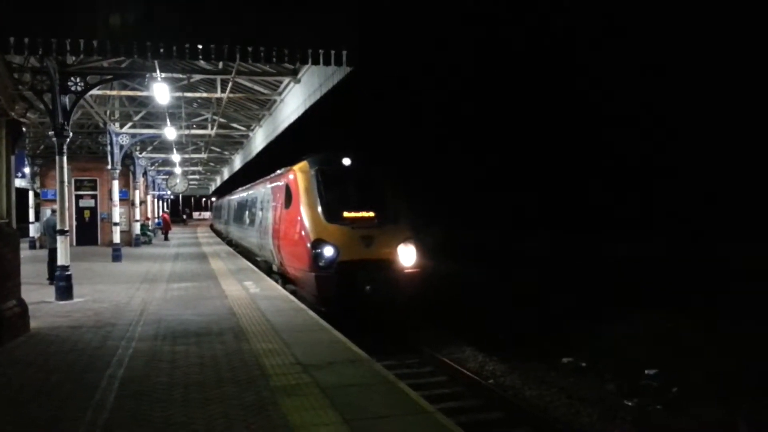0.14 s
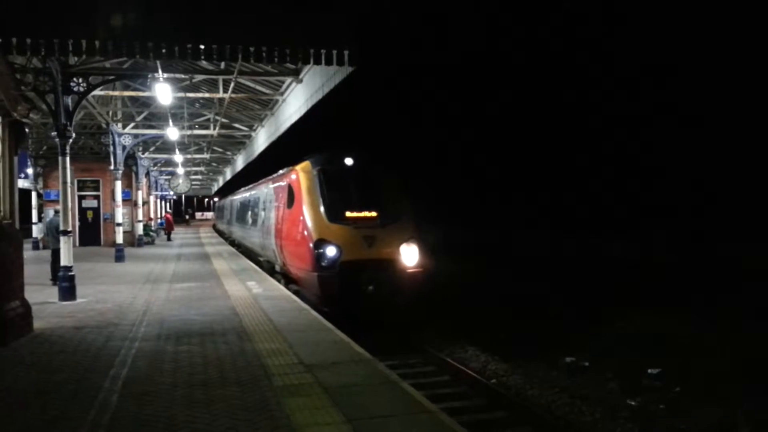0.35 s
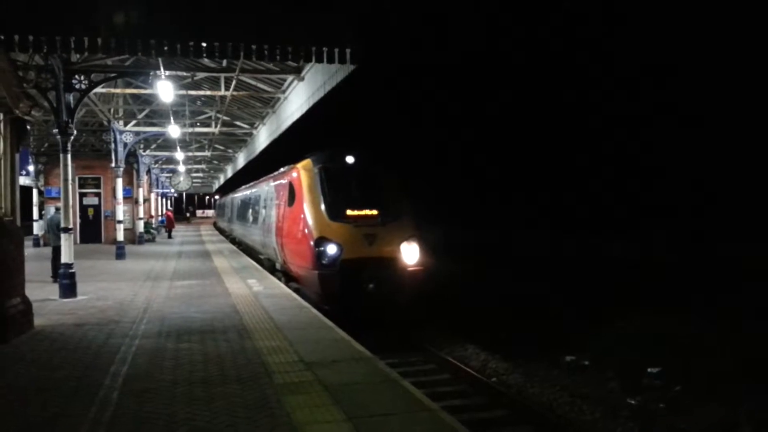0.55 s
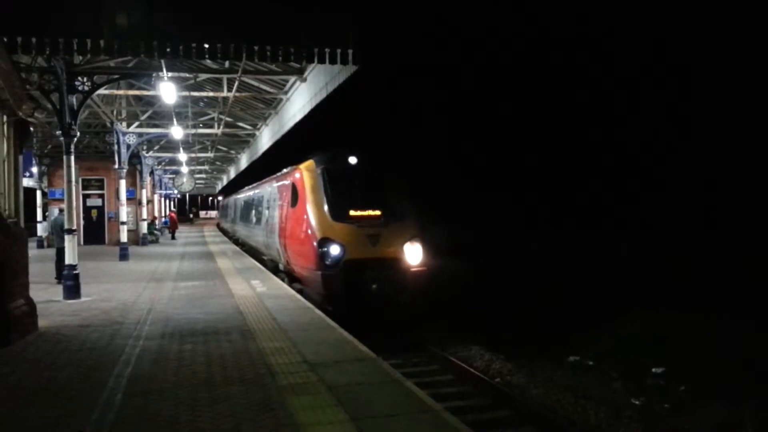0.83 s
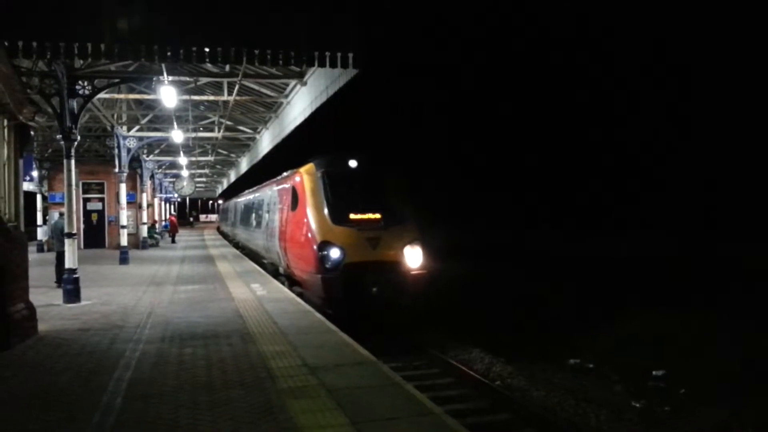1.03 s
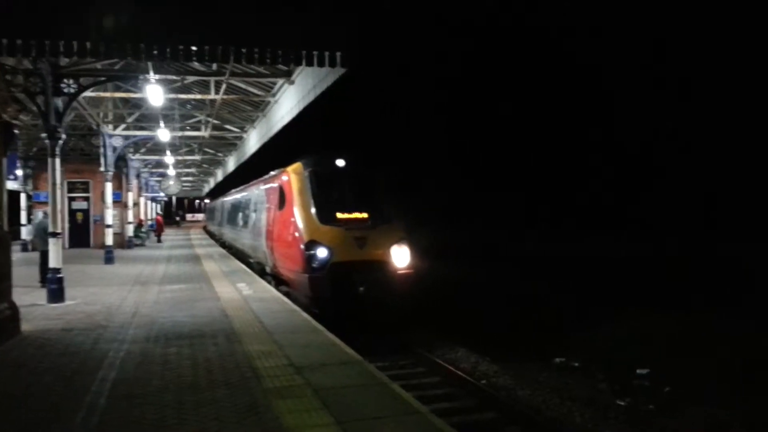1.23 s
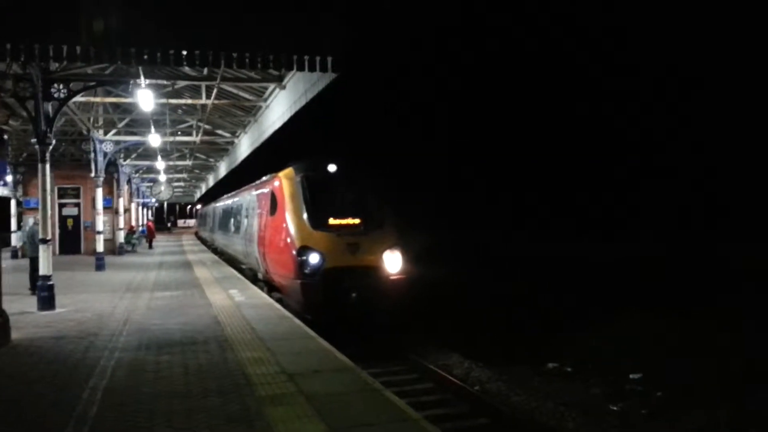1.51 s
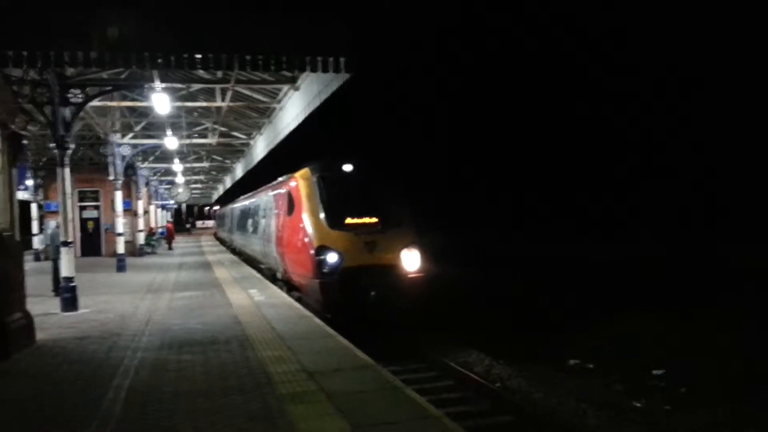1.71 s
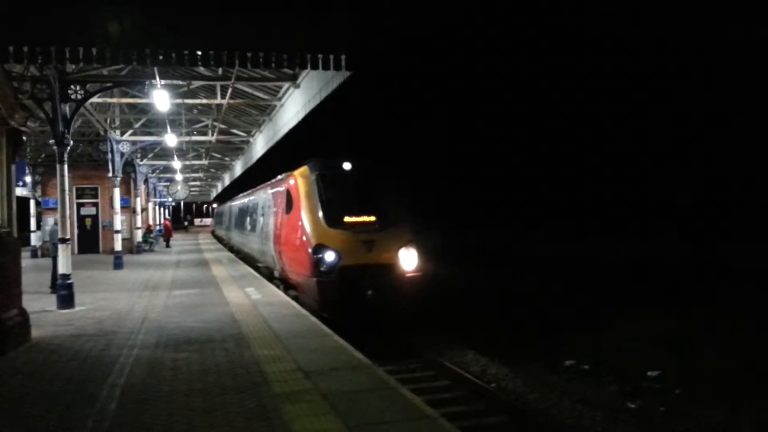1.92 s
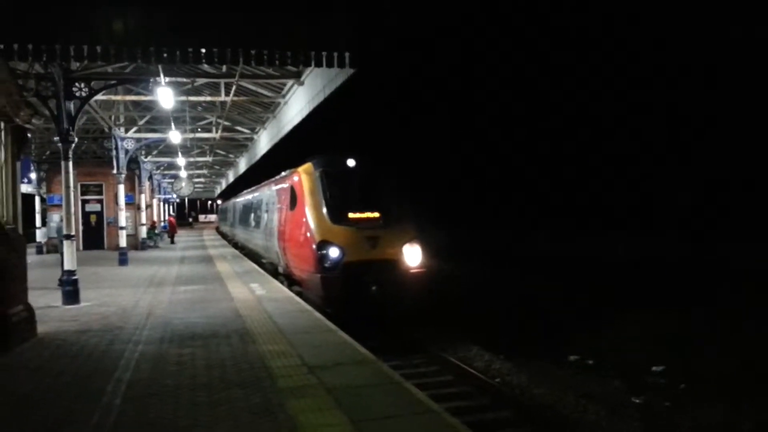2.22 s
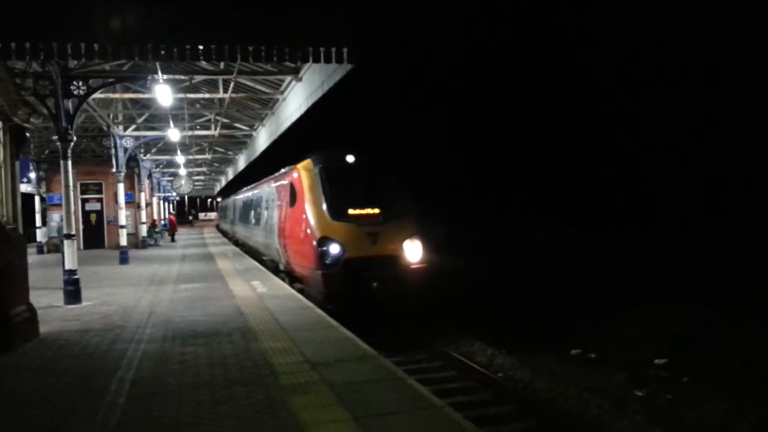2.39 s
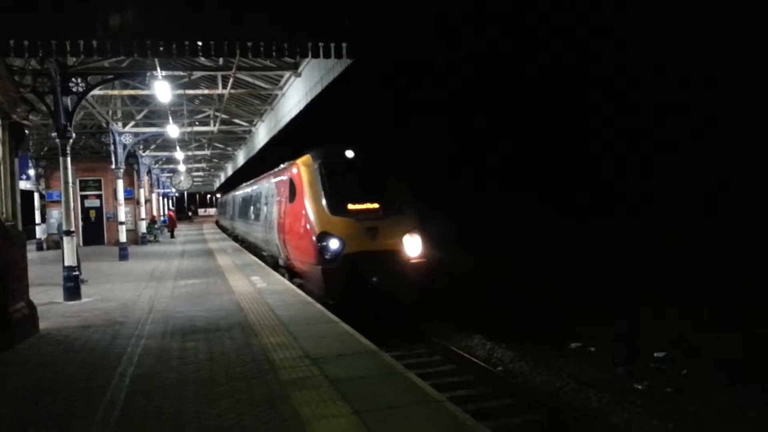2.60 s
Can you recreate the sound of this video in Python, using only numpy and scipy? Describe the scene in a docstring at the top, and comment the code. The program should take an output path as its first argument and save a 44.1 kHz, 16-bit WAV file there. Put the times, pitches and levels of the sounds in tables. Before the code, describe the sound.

Continuous idling of several underfloor diesel engines beside an open, canopied platform, slowly beating hum and roar under a constant whine; from about one second, faint air hiss flickers at the right of the wide stereo pickup.

```python
"""A station platform, where a diesel train idles. Three underfloor engines each repeat a fixed cycle at nearly
the same speed, so their harmonics beat slowly; casings ring near 850, 1700 and 3100 Hz (the whine).
Coloured noise makes the fan and exhaust roar, sines the steady tones: strong upper harmonics of the
engines, and a fan or alternator near 245 Hz. A faint air hiss, treble noise, flutters on the right.
Two spaced microphones hear the bass alike and the treble unalike."""
import sys
import numpy as np
from scipy import signal
from scipy.fft import irfft
from scipy.io import wavfile
from scipy.ndimage import uniform_filter1d

SR = 44100
rng = np.random.default_rng(int(sys.argv[2]) if len(sys.argv) > 2 else 0)


def dump(signal):
    """Clip the signal to [-1, 1] and save it as 16-bit WAV at the path in sys.argv[1]."""
    limited = np.clip(np.atleast_2d(signal).T, -1, 1)
    pcm = np.round(limited * 32767).astype(np.int16)
    wavfile.write(sys.argv[1], SR, pcm)


def ratio(d):
    """dB to gain"""
    e = np.asarray(d, float) / 20
    return 10 ** e


N = 121275  # samples


def evened(x):
    """Normalisation: scales a signal to an rms of 1."""
    return x / np.sqrt(np.mean(x ** 2) + 1e-20)


def read(points, hz, column=1):
    """Spectral envelope: one column of a table, interpolated over log frequency."""
    rows = np.array(points, float)
    return np.interp(np.log(hz + 1), np.log(rows[:, 0] + 1), rows[:, column])


def slow(t, fastest_per_s):
    """Random modulation of rms 1: superposed slow sines, weaker as they get faster."""
    rate = np.geomspace(fastest_per_s / 10, fastest_per_s, 20)
    turn = rng.random(20)
    waves = np.sin(2 * np.pi * (rate * t[:, None] + turn)) / np.sqrt(rate)
    return waves.sum(1) / np.sqrt((.5 / rate).sum())


# Spaced microphone pair: frequency_hz, likeness (0-1), left_minus_right_db
MICROPHONES = [(40, 1, -3), (130, 1, -1), (314, 0.94, 0.5), (600, 0.79, -1), (836, 0.75, 1.2),
               (1150, 0.22, 2), (1450, 0.1, 3.5), (1710, 0.57, 5.5), (2010, 0.06, 6.5), (2410, 0.2, 7.5),
               (3170, 0, 3), (4330, 0, 0.5), (7450, 0.1, 1.5), (9000, 0, -11.5), (14000, 0.5, -23)]
# Phase between the microphones: frequency_hz, left_lag_rad
PHASE_LAG = [(60, .05), (340, .17), (860, .2), (1150, .6), (1650, 1.25), (2200, 1.2), (3200, .9)]


def paired(z1, z2, hz):
    """Partial coherence: left and right spectra share less of one source where likeness is low."""
    likeness = np.clip(read(MICROPHONES, hz), 0, 1)
    tilt_db = read(MICROPHONES, hz, column=2)
    mixed = likeness * z1 + np.sqrt(1 - likeness ** 2) * z2
    right = mixed * np.exp(1j * read(PHASE_LAG, hz))
    return np.array([z1 * ratio(tilt_db / 2), right * ratio(-tilt_db / 2)])


# Broad colour of the casing sound per Hz: frequency_hz, level_db (relative)
CASING_COLOUR = [(25, -40), (65, -40), (100, -26), (140, -8.5), (190, -5), (280, -2.5), (420, -6.5),
                 (520, -6), (1100, -5.5), (1400, -8.5), (1900, -12), (2700, -16), (3800, -21), (5500, -29),
                 (7800, -34.5), (10000, -49), (15000, -63)]
# Casing resonances: frequency_hz, width_hz (centre to 1/e of the boost), boost_db
CASING_RINGS = [(693, 32, 3), (833, 89, 4.5), (1642, 112, 10), (1741, 36, 6.5), (3135, 230, 7.5),
                (4580, 360, 3), (7160, 330, 3.5)]


def casing_db(hz):
    """Resonance: bell-shaped boosts stand on the broad radiation colour of the casing."""
    boosts = [db * np.exp(-((hz - centre) / width) ** 2) for centre, width, db in CASING_RINGS]
    return read(CASING_COLOUR, hz) + sum(boosts)


ROAR_DB = -30.5  # rms of the roar, before the slow drift; also the reference for the engine harmonics


def harmonic_reference_db():
    """Band power: level of a harmonic that carries one cycle-wide band of casing sound at 0 dB colour."""
    hz = np.arange(1, SR // 2)
    cycles_per_s = ENGINE_SPEEDS[0][0]
    return ROAR_DB - 10 * np.log10((ratio(casing_db(hz)) ** 2).sum() / cycles_per_s)


# Low harmonics of the cycle, one value each from the first upward: level_db (relative to THROB_DB)
LOW_HARMONICS = [-48, -48, -40, -24, -28, -19.5, -36, -38, -25, -28, -31, -11, -27, -11, -10, -17, -22, 1,
                 -11, -18, -9, -7, -10, -5, -14, -11, -5, -9, -12, -10, -12, -7, -8, -6, -7, -7, -8, -8, -8,
                 -14, -18, -11, -15, -10, -15, -6, -15, -11, -18, -15, -14, -20, -15, -10]
# Share of the casing sound that repeats each cycle: frequency_hz, level_db (relative)
CYCLE_REPEATS = [(400, -1), (900, -2.5), (1300, -8), (1700, 0), (2300, -10.5), (3300, -15)]
THROB_DB, HARMONIC_SPREAD_DB = -43, 0.5  # level of a 0 dB low harmonic, rms scatter of all harmonics
HUNTING_SHARE, HUNTING_PER_S = 0.001191, 2.499  # rms share of speed, fastest rate


def engine(cycles_per_s, level_db, harmonics=400, size=8192):
    """Fourier synthesis: one four-stroke cycle of fixed shape, replayed as the governor hunts in speed."""
    hz = np.arange(1, harmonics + 1) * cycles_per_s
    db = harmonic_reference_db() + casing_db(hz) + read(CYCLE_REPEATS, hz)
    db[:len(LOW_HARMONICS)] = THROB_DB + np.array(LOW_HARMONICS)
    turn1, turn2, scatter = rng.random((3, harmonics))
    db += HARMONIC_SPREAD_DB * np.sqrt(12) * (scatter - .5)
    z1 = ratio(db) * np.exp(2j * np.pi * turn1)
    z2 = ratio(db) * np.exp(2j * np.pi * turn2)
    spectrum = np.pad(paired(z1, z2, hz), ((0, 0), (1, 0)))  # nothing at 0 Hz
    cycle = irfft(spectrum, size) * size / np.sqrt(2)
    knots_s = np.arange(0, N + 512, 512) / SR
    hunting = np.interp(np.arange(N) / SR, knots_s, slow(knots_s, HUNTING_PER_S))
    speed = cycles_per_s * (1 + HUNTING_SHARE * hunting)
    place = np.cumsum(speed) / SR * size
    heard = [np.interp(place, np.arange(size), channel, period=size) for channel in cycle]
    return ratio(level_db) * np.array(heard)


# The three engines: cycles_per_s (four-stroke), level_db (relative, before their power is shared out)
ENGINE_SPEEDS = [(8.288, 0), (8.306, -6), (8.255, -8)]


def engines():
    """Beating: harmonics of nearly equal speeds drift in and out of phase; the total power is fixed."""
    total = np.sqrt(sum(ratio(db) ** 2 for _, db in ENGINE_SPEEDS))
    return sum(engine(*row) for row in ENGINE_SPEEDS) / total


def noise(colour_db, size=2048):
    """Gaussian noise: two independent sets of coloured short-time spectra, frames x bins."""
    hz = np.fft.rfftfreq(size, 1 / SR)
    a, b, c, d = rng.standard_normal((4, N // (size // 4) + 5, len(hz)))
    colour = ratio(colour_db(hz))
    return hz, (a + 1j * b) * colour, (c + 1j * d) * colour


def played(z):
    """Overlap-add: short-time spectra become two channels of sound."""
    size = 2 * (z.shape[-1] - 1)
    return signal.istft(np.swapaxes(z, 1, 2), nperseg=size, noverlap=size * 3 // 4)[1][:, :N]


PATCHY_DB, SWELL_DB, SWELL_PER_S = 0.52, 0.14, 2.01  # rms of patches, rms of swell, its fastest rate


def roar():
    """Turbulence noise of fans, exhaust flow and farther engines: casing-coloured, patchy and swelling."""
    hz, z1, z2 = noise(casing_db)
    smooth_in_time = uniform_filter1d(rng.standard_normal(z1.shape), 8, 0)
    patches = evened(uniform_filter1d(smooth_in_time, 14, 1))
    swell = slow(np.arange(len(z1)) * 512 / SR, SWELL_PER_S)[:, None]
    gain = ratio(PATCHY_DB * patches + SWELL_DB * swell)
    return ratio(ROAR_DB) * evened(played(paired(z1, z2, hz) * gain))


WAVER_DB, WAVER_PER_S = 1.5, 12  # rms, fastest rate
# Steady tones that stand out: upper engine harmonics and whine, a fan or alternator at 245.4 Hz:
# pitch_hz, level_db (rms, before microphone gains and drift)
STEADY_TONES = [(245.4, -41.5), (308.5, -54), (621, -54), (655, -53), (698, -48), (779, -53), (821, -51),
                (846.5, -45), (871, -52), (945.5, -50), (1637, -49), (1676, -49.5), (1711, -46),
                (1735, -43.5), (2992, -64), (3212, -61.5), (3428, -67)]


def tones():
    """Amplitude modulation: sines of fixed pitch, each wavering in level."""
    t, out = np.arange(N) / SR, np.zeros((2, N))
    for hz, db in STEADY_TONES:
        gains = abs(paired(0.91, 1j, hz))[:, None]
        lag = np.exp([[0], [1j * read(PHASE_LAG, hz)]])
        wave = gains * lag * np.exp(2j * np.pi * (hz * t + rng.random()))
        waver = np.interp(t, t[::512], slow(t[::512], WAVER_PER_S))
        out += np.sqrt(2) * wave.imag * ratio(db + WAVER_DB * waver)
    return out


# Slow drift: time_s, bass_db (below the split), rest_db
LEVEL_DRIFT = [(0, 1, -.5), (.4, -1, 0.5), (.85, 0.5, 0), (1.2, 4.5, 0), (1.55, 3.5, 0), (1.95, 6, 0),
               (2.2, 5.5, 0.15), (2.45, 2, -0.04), (2.75, 3, 0)]
DRIFT_SPLIT_HZ = 130
# Added drift of the hum and two casing rings: time_s, near_150_hz_db, near_850_hz_db, near_1700_hz_db
HUM_AND_RING_DRIFT = [(0, 1, 0, -1.5), (.3, 1, -1.5, -2.5), (.5, -1, -3.5, -2), (.8, 1.5, 0.5, 2),
                      (1.08, 3.5, -1, -3), (1.3, 0.5, 4, .5), (1.45, -3.5, -1.5, 0.5),
                      (1.62, -7.5, -.5, -2.5), (1.85, -4, 1.5, 1), (2.1, -1, 2.5, 2.5), (2.3, -0.5, -2, -2),
                      (2.45, 1, -0.5, 0.5), (2.65, -2, 3.5, -3), (2.75, -1, -4, -4)]
# Bands of the hum and the two rings: low_hz, high_hz
HUM_AND_RING_BANDS = [(140, 159), (790, 890), (1600, 1770)]


def drifting(x):
    """Band-wise gain: bass, hum, two rings and the rest rise and sink, each in its own way."""
    t = np.arange(N) / SR
    low_pass = signal.butter(4, DRIFT_SPLIT_HZ, fs=SR, output="sos")
    bass = signal.sosfiltfilt(low_pass, x)
    rest = x - bass
    ring_s, *ring_db = np.transpose(HUM_AND_RING_DRIFT)
    for band, db in zip(HUM_AND_RING_BANDS, ring_db):
        band_pass = signal.butter(2, band, "bandpass", fs=SR, output="sos")
        ring = signal.sosfiltfilt(band_pass, x)
        rest = rest + ring * (ratio(np.interp(t, ring_s, db)) - 1)
    s, bass_db, rest_db = np.transpose(LEVEL_DRIFT)
    return bass * ratio(np.interp(t, s, bass_db)) + rest * ratio(np.interp(t, s, rest_db))


# Flutter of the air hiss: time_s, level_db (before smoothing and the left and right gains)
HISS_FLUTTER = [(0.0, -51), (0.01, -74), (1.09, -65), (1.19, -58), (1.19, -64), (1.39, -54.5), (1.45, -61),
                (1.48, -51), (1.49, -58), (1.56, -63), (1.62, -52.5), (1.65, -61), (1.76, -71), (1.94, -58),
                (1.97, -73), (2.01, -59), (2.21, -54), (2.23, -64), (2.37, -64), (2.39, -53.5), (2.62, -74),
                (2.75, -60)]
# Colour of the hiss per Hz: frequency_hz, level_db (relative)
HISS_SPECTRUM = [(4000, -13), (7000, 2), (9000, 0.5), (11000, -4), (13000, -4), (15000, -4.5)]
HISS_LEFT_DB, HISS_RIGHT_DB, HISS_SMOOTH_S = -12, 3, .02


def hiss():
    """Jet noise of air: treble noise, mostly right, under a fluttering envelope."""
    hz, z1, z2 = noise(lambda f: read(HISS_SPECTRUM, f) - 80 * (f < 3000), size=512)
    both = evened(played(np.array([z1, z2]))) * ratio(np.array([[HISS_LEFT_DB], [HISS_RIGHT_DB]]))
    s, db = np.transpose(HISS_FLUTTER)
    flutter_db = np.interp(np.arange(N) / SR, s, db)
    return both * ratio(uniform_filter1d(flutter_db, round(HISS_SMOOTH_S * SR)))


def scene():
    """Superposition: engines, roar and tones drift together; the hiss is added undrifted."""
    return drifting(engines() + roar() + tones()) + hiss()


def roll_off(x):
    """The treble ends steeply here."""
    return signal.sosfilt(signal.butter(12, 14600, fs=SR, output="sos"), x)


EDGE_HZ = 14800


def record(dry):
    """Band limiting: a linear-phase low-pass removes the highest treble."""
    edge = signal.firwin(511, EDGE_HZ, window=("kaiser", 9), fs=SR)[None]
    mix = signal.oaconvolve(dry, edge, "same")
    return roll_off(mix)


dry = scene()
out = record(dry)
dump(out)
```